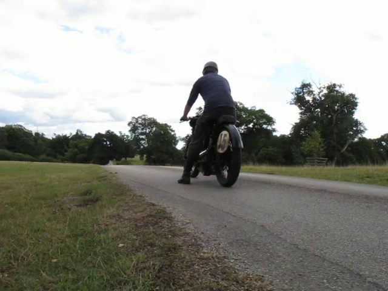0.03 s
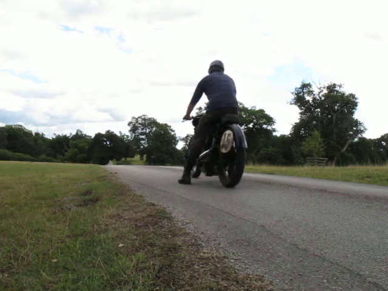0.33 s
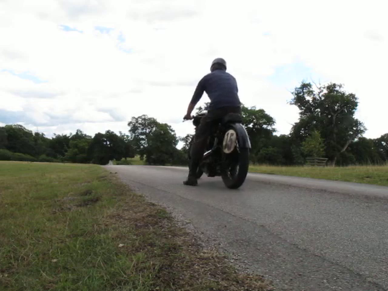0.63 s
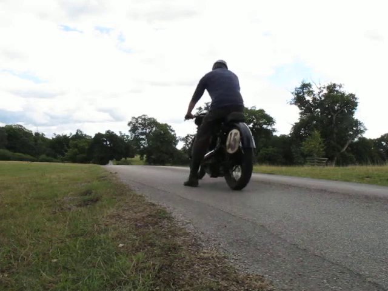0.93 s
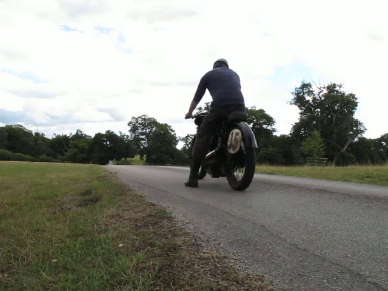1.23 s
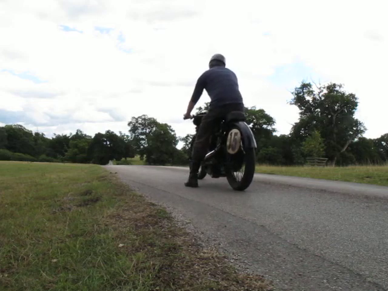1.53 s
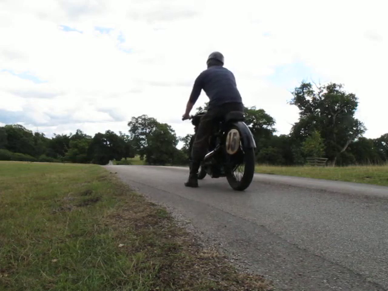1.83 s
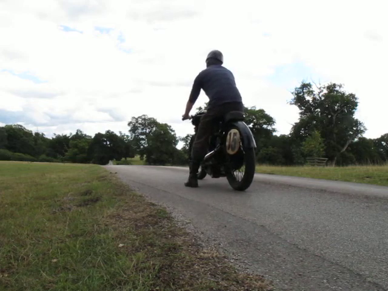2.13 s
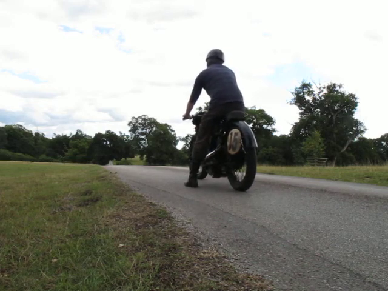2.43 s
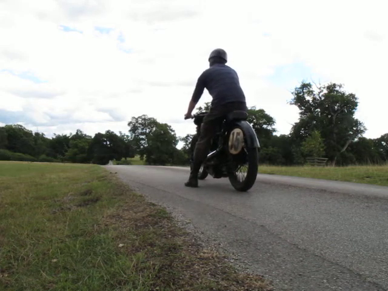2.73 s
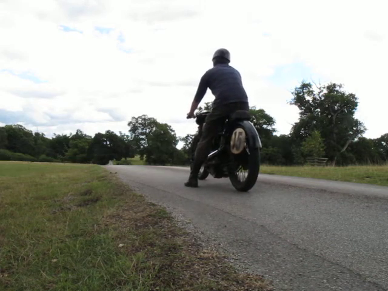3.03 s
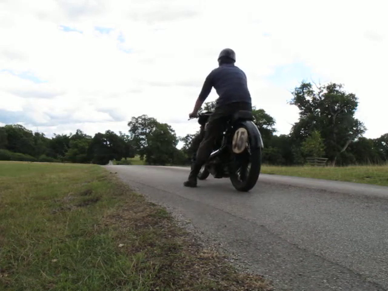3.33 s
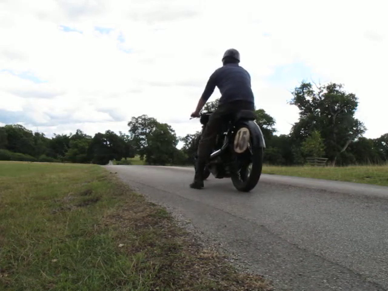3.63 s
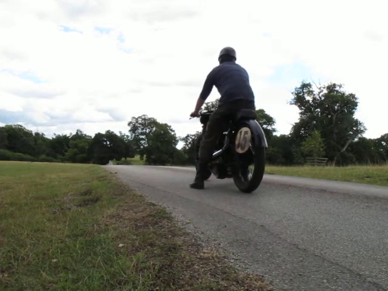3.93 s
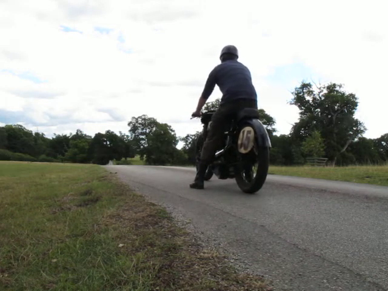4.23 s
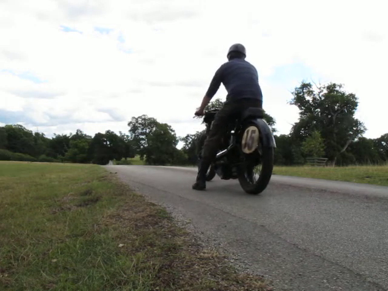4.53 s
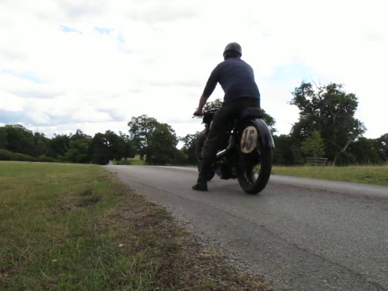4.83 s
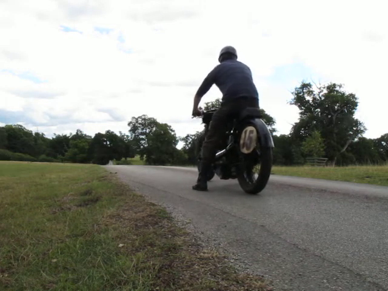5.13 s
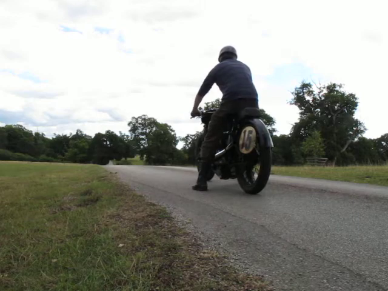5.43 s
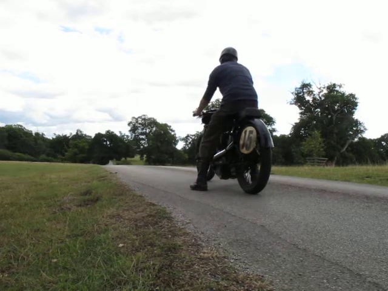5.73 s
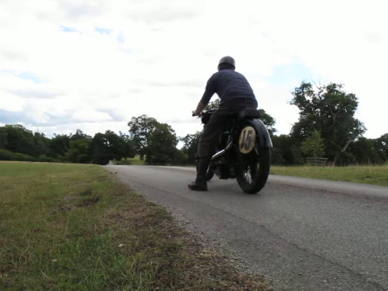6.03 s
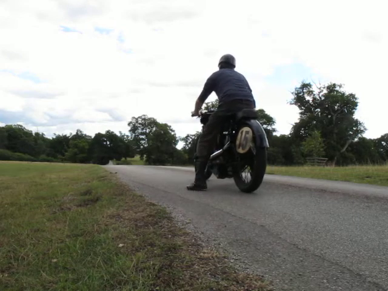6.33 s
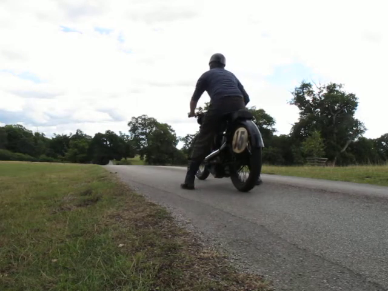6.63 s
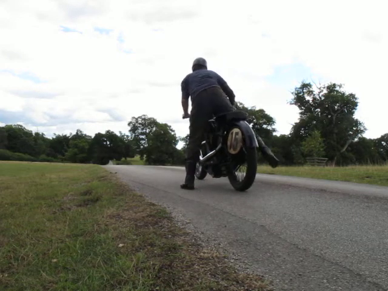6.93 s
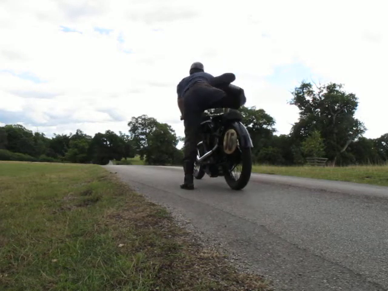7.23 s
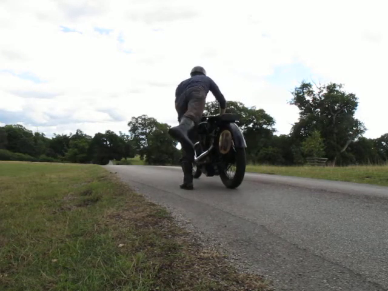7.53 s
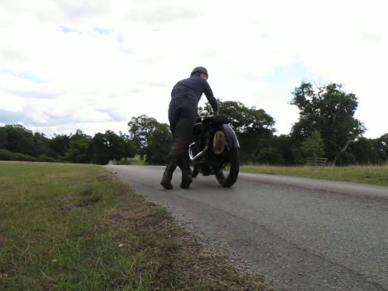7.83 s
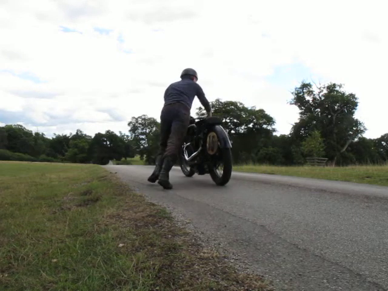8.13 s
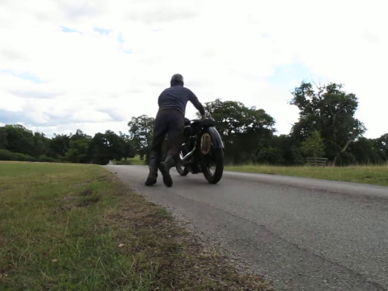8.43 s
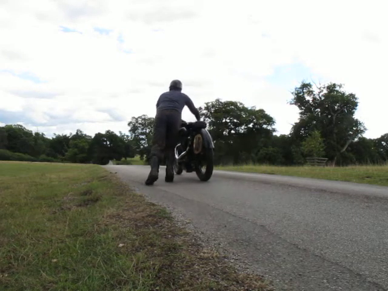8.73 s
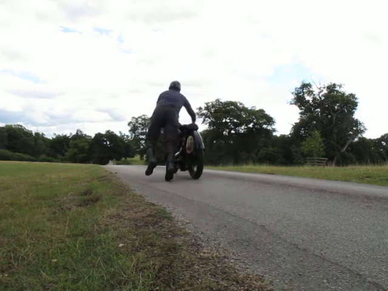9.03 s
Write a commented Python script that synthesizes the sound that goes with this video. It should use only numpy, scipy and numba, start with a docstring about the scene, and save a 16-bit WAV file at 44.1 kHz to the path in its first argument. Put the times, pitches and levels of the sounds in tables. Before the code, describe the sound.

An old motorcycle is shuffled about on a country road without its engine running, giving dry metal clacks and clicks between dull boot steps and gritty scuffs. Brighter clinks and clanks follow, and near the end the chain tinkles as the machine rolls. Low gusts of wind rumble on the microphone a few metres away, easing midway and returning, over a faint outdoor hush.

```python
"""Old motorcycle pushed off

A country road, the microphone a few metres from an old motorcycle, engine off. As it is rocked and
shuffled, lever and linkage clack, loose steel clinks, and boots thud and scuff on grit. Then it is
pushed off and the chain jingles with the wheel. Wind rumbles on the microphone over a faint hush."""
import sys
import numpy as np
from scipy import signal
from scipy.fft import rfft, irfft, next_fast_len
from scipy.io import wavfile
from scipy.ndimage import uniform_filter1d
from numba import njit

SR = 44100
rng = np.random.default_rng(int(sys.argv[2]) if len(sys.argv) > 2 else 0)


def store_pcm(level_fs):
    """Save levels as 16-bit WAV."""
    pcm = np.round(np.clip(level_fs, -1, 1) * 32767).astype(np.int16)
    wavfile.write(sys.argv[1], SR, np.atleast_2d(pcm).T)


N = 405719
T = np.arange(N) / SR
BLOW_T = T[:SR // 4]  # time within one blow

# boots landing: t/s, thud level/dB, thud t60/s, sole slide level/dB
FOOTFALLS = [(0.895, -31.5, 0.19, -59.5), (3.316, -31, 0.059, -63), (3.593, -35, 0.16, -57.5),
             (4.225, -34.5, 0.027, -80), (4.484, -35.5, 0.13, -78), (4.573, -32.5, 0.14, -56.5),
             (5.717, -40.5, 0.076, -79), (6.576, -36, .12, -76), (7.77, -31, 0.13, -62),
             (8.739, -34, 0.076, -73), (9.118, -33.5, 0.13, -50.5)]
# spectrum of dry rubbing and snapping: f/Hz, level/dB
FRICTION_COLOUR = [(700, -1), (1500, -6.5), (2600, 2.5), (4500, 1), (7000, 1), (9800, 4), (12000, -7.5),
                   (16000, -25)]


def undb(db):
    """Decibels to gain."""
    return 10 ** (np.asarray(db) / 20)


def unit(x):
    """Scale to rms 1."""
    return x / np.sqrt(np.mean(x ** 2))


def crest(x, size=110):
    """Scale so that the loudest few milliseconds have rms 1."""
    return x / np.sqrt(uniform_filter1d(x ** 2, size).max())


def add(track, s, x):
    """Mix x into the track from time s."""
    i = max(int(s * SR), 0)
    track[i:i + len(x)] += x[:N - i]


def colour(x, points):
    """Causal filter through (f/Hz, level/dB) points, built from the cepstrum of the log gain."""
    size = 2 * next_fast_len(len(x) // 2 + 2048)
    hz, db = np.transpose(points)
    bin_hz = np.arange(size // 2 + 1) * SR / size
    gain_db = np.interp(np.log(bin_hz + 1), np.log(hz), db)
    cepstrum = irfft(np.log(undb(gain_db)))
    cepstrum[1:size // 2] *= 2
    cepstrum[size // 2 + 1:] = 0
    return irfft(rfft(x, size) * np.exp(rfft(cepstrum)))[:len(x)]


def tone(x, lows_db=0, highs_db=0):
    """Lift or lower both ends of the spectrum against the middle."""
    return colour(x, [(1400, lows_db), (2300, 0), (4200, 0), (6800, highs_db)])


def wander(rate):
    """Random levels held 1 / rate s and smoothed twice, rms 1."""
    hold = int(SR / rate)
    steps = np.repeat(rng.standard_normal(N // hold + 1), hold)
    return unit(uniform_filter1d(uniform_filter1d(steps, hold), hold)[:N])


def fade(t60):
    """Exponential decay over one blow."""
    return undb(-60 * BLOW_T / max(t60, .002))


def chatter(t60):
    """A contact rattles out in a dense run of tiny impacts: decaying noise."""
    return rng.standard_normal(len(BLOW_T)) * fade(t60)


def ring(modes, scatter_db, detune=0.0024):
    """Struck modes: each striking point weights them differently and loose joints detune them."""
    out = 0
    for hz, db, t60 in modes:
        weight, phase, drift = rng.standard_normal(3)
        wave = np.sin(2 * np.pi * hz * (1 + detune * drift) * BLOW_T + np.pi * phase)
        out += undb(db + scatter_db * weight) * fade(t60) * wave
    return out


def grains(rate, spread_db):
    """Random clicks of very uneven size, rms 1."""
    clicks = (rng.random(N) < rate / SR) * rng.standard_normal(N)
    return unit(clicks * undb(spread_db * np.minimum(rng.exponential(size=N), 4)))


def hush(db=-53.5, traffic_db=-55, fade_s=1.5):
    """Far trees and traffic; a duller wash of distant traffic dies away at the start."""
    # open-air spectrum: f/Hz, level/dB
    air = [(80, -5.5), (200, -2.5), (400, -9), (700, -11.5), (1050, -12), (1600, -21.5), (2600, -25.5),
           (5000, -28), (9500, -28.5), (12500, -34.5), (16000, -43)]
    steady = undb(db + .5 * wander(1.18)) * unit(colour(rng.standard_normal(N), air))
    wash = unit(colour(rng.standard_normal(N), air))
    traffic = colour(wash, [(1300, 0), (3500, -16)])
    return steady + undb(traffic_db) * np.exp(-(T / fade_s) ** 2) * traffic


def gusts(rise_db_per_s=50, fall_db_per_s=45.5):
    """Strength of rumble and of eddies: each gust swells, holds and dies away; their powers add."""
    # gusts on the microphone: t/s, hold/s, rumble level/dB, eddy level/dB
    spells = [(0.362, 0.85, -22.5, -40), (1.253, 0.2, -19.5, -30), (1.59, 1.14, -29.5, -58),
              (3.014, 0.15, -24.5, -55.5), (4.447, 0.071, -55, -48.5), (5.17, 0.88, -33, -62),
              (5.825, 0.22, -24.5, -55), (6.372, 0.19, -20.5, -41), (6.978, 0.9, -22.5, -40.5),
              (8.03, 1.14, -21.5, -37.5)]
    rumble_power = eddy_power = 0
    for start, hold, rumble_db, eddy_db in spells:
        below_db = rise_db_per_s * np.maximum(start - T, 0)
        below_db += fall_db_per_s * np.maximum(T - start - hold, 0)
        rumble_power += undb(rumble_db - below_db) ** 2
        eddy_power += undb(eddy_db - below_db) ** 2
    return np.sqrt(rumble_power), np.sqrt(eddy_power)


def wind(flutter_db=5.5, surge_db=2.0, lull_db=-38.5, half_buffet_cycles=0.62):
    """Large eddies rumble, small ones flutter, and a few strike the microphone as single buffets."""
    # spectra of large and small eddies: f/Hz, level/dB
    rumble_colour = [(10, -3.5), (25, 6), (46, -3), (80, -13), (120, -26.5), (230, -45), (500, -79.5),
                     (8000, -130)]
    eddy_colour = [(50, -9.5), (102, 6.5), (140, -5), (190, -10.5), (270, -18.5), (500, -32), (8000, -100)]
    # single buffets: t/s, level/dB, f/Hz
    buffets = [(.295, -18.5, 62), (0.461, -22.5, 109), (.80, -18, 109), (0.846, -12, 44),
               (1.208, -4.5, 129), (1.226, 3, 66.7), (1.381, -18.5, 141), (1.515, -16.5, 122),
               (1.76, -10.5, 33.5), (2.997, -17.5, 44.7), (3.044, -17.5, 30), (3.137, -16.5, 47.3),
               (3.197, -19.5, 33.6), (5.17, -24, 45.3), (6.094, -12, 32.4), (7.079, -14.5, 50)]
    rumble = colour(rng.standard_normal(N), rumble_colour)
    rumble /= np.sqrt(uniform_filter1d(rumble ** 2, size=6000))  # even out before the gusts shape it
    eddies = unit(colour(rng.standard_normal(N), eddy_colour) * undb(flutter_db * wander(26)))
    rumble_gain, eddy_gain = gusts()
    surge = undb(surge_db * wander(14))
    out = np.hypot(rumble_gain, undb(lull_db)) * surge * rumble + eddy_gain * eddies
    for s, db, hz in buffets:
        cycles = hz * (T - s)
        swell = np.exp(-(cycles / half_buffet_cycles) ** 2)
        out += undb(db) * swell * np.cos(2 * np.pi * (cycles + rng.random()))
    return out


def scuffs(sole_s=.1, sole_highs_db=-2):
    """Each slide is a swell of fine friction grains; a short one follows every landing boot."""
    # longer slides of soles and clothing: t/s, length/s, level/dB, highs/dB
    slides = [(.47, 0.1, -51.5, -8), (.92, 0.15, -56, -5), (1.67, 0.16, -60, 17), (3.42, 1.0, -66.5, 2),
              (4.03, 0.46, -58, 0), (6.68, 0.24, -62, 0)]
    out = np.zeros(N)
    friction = colour(grains(rate=9000, spread_db=3.0), FRICTION_COLOUR)
    soles = [(s, sole_s, db, sole_highs_db) for s, _, _, db in FOOTFALLS]
    for s, length, db, highs_db in slides + soles:
        slide = unit(tone(friction[(T >= s) & (T < s + length)], highs_db=highs_db))
        add(out, s, undb(db) * slide * np.sin(np.linspace(0, np.pi, len(slide))))
    return out


def snap(t60, highs_db):
    """A brief, bright contact with hardly any ring."""
    return crest(tone(colour(chatter(t60), FRICTION_COLOUR), highs_db=highs_db))


def grit(t60=0.013):
    """Small stones crack under soles and tyres."""
    # cracks: t/s, level/dB, highs/dB
    stones = [(0.5563, -37.5, -6), (0.5742, -33.5, -15.5), (3.3308, -35, -13), (5.85, -32, 1),
              (7.805, -43, 6), (9.1424, -33.5, -5)]
    out = np.zeros(N)
    for s, db, highs_db in stones:
        add(out, s, undb(db) * snap(t60, highs_db))
    return out


def boots():
    """Each heel lands on the road with a dull thud."""
    # thud spectrum: f/Hz, level/dB
    thud_colour = [(90, -31), (160, 1.5), (230, 1), (340, -3.5), (500, -12.5), (900, -26), (9000, -34.5),
                   (15000, -52)]
    out = np.zeros(N)
    for s, db, t60, _ in FOOTFALLS:
        add(out, s, undb(db) * crest(colour(chatter(t60), thud_colour)))
    return out


def saddle(start=5.475, length=0.14, first_hz=90, last_hz=260, db=-55):
    """The saddle creaks, sticking and slipping faster and faster as the weight shifts."""
    slip_hz = np.linspace(first_hz, last_hz, int(length * SR))
    since_slip = np.cumsum(slip_hz) / SR % 1  # in cycles
    slips = rng.standard_normal(len(slip_hz)) * np.exp(-since_slip / 0.18)
    creak = unit(colour(slips, FRICTION_COLOUR))
    out = np.zeros(N)
    add(out, start, undb(db) * creak * np.sin(np.linspace(0, np.pi, len(creak))))
    return out


def spring(start=3.462, step_s=0.016, db=-47.5, fall_db=1.5, count=6):
    """A small return spring buzzes against its seat, a little weaker on each bounce."""
    # spring modes: f/Hz, level/dB, t60/s
    modes = [(5470, -5, .018), (6200, -1, 0.02), (7200, 0, 0.02)]
    out = np.zeros(N)
    for bounce in range(count):
        add(out, start + bounce * step_s, undb(db - fall_db * bounce) * crest(ring(modes, scatter_db=0)))
    return out


def ratchet(start=3.763, step_s=0.081, db=-46, count=6):
    """A pawl ticks lightly over an even row of teeth."""
    out = np.zeros(N)
    for s in start + step_s * np.arange(count):
        add(out, s, undb(db) * snap(t60=0.011, highs_db=4))
    return out


def chain(push_off_s=8.16, speed_up_s=0.34, roll_db=-45, tinkle_count=44):
    """Links drop with a bright jingle; once the wheel turns, light tinkles ride on rollers and tyres."""
    # heavy links dropping on the sprocket: t/s, level/dB, highs/dB
    links = [(6.085, -31.5, 1), (7.127, -50, -1), (7.448, -53.5, 17), (7.564, -43, 1), (7.962, -41.5, 8.5),
             (8.308, -41.5, -2), (8.45, -35.5, 6), (8.613, -37, 4), (8.657, -35, 6), (8.795, -45, 5),
             (8.904, -42.5, -3), (9.025, -33.5, 3), (9.06, -34, 2.5), (9.095, -30, 6.5)]
    # modes of chain and sprocket: f/Hz, level/dB, t60/s
    modes = [(1294, 0.5, 0.024), (1772, -4, 0.055), (2540, 0.5, 0.034), (2900, -2, 0.043),
             (3070, -2, 0.053), (4030, -2.5, 0.035), (5670, -3.5, 0.041), (5910, -3, 0.037),
             (7130, -0.5, 0.035), (8090, 2, 0.048), (8420, 3, 0.048), (9290, -1, 0.042),
             (10420, -12, 0.086), (13000, -20, 0.09)]
    # contact spectrum: f/Hz, level/dB
    contact_colour = [(300, -10), (700, 0), (1400, 2.5), (2900, -6.5), (4400, -10.5), (5800, -7),
                      (8300, -6.5), (10500, -10), (12500, -27), (16000, -55)]
    drops, tinkles = np.zeros(N), np.zeros(N)
    for s, db, highs_db in links:
        rattle = crest(colour(chatter(0.11), contact_colour))
        jingle = crest(ring(modes, scatter_db=5.5) * (1 - fade(0.0018)))
        add(drops, s, undb(db) * crest(tone(rattle + undb(3) * jingle, highs_db=highs_db)))
    slots = np.linspace(push_off_s, T[-1], tinkle_count)
    for s, (early, size) in zip(slots, rng.random((tinkle_count, 2))):
        # a link slides into contact, so its ring swells for a moment
        scrape = crest(tone(colour(chatter(.04), contact_colour), highs_db=-5))
        jingle = crest(ring(modes, scatter_db=6, detune=.008) * (1 - fade(.01)))
        add(tinkles, s - 0.033 * early, size * crest(jingle + undb(-4) * scrape))
    # rollers held tight on the teeth ring the same modes, but damped
    taps = grains(rate=260, spread_db=3)
    damped = tone(ring(modes, scatter_db=1.5), highs_db=-7.5) * fade(0.018)
    rollers = unit(signal.oaconvolve(taps, damped)[:N])
    tyres = unit(colour(rng.standard_normal(N), contact_colour) * undb(2.4 * wander(45)))
    rolling = undb(7) * tinkles + undb(-9) * rollers + undb(-10) * tyres
    speed = 1 - np.exp(-np.maximum(T - push_off_s, 0) / speed_up_s)  # share of walking pace
    return drops + undb(roll_db) * speed * rolling


def struck_steel(blows, modes):
    """Steel parts chatter against each other and are left ringing."""
    # chatter spectrum: f/Hz, level/dB
    contact_colour = [(400, -10), (950, 2.5), (1300, 5), (1850, 3.5), (2300, -4), (3000, -1), (3800, -5),
                      (7000, 4), (9900, -1), (12000, -19), (16000, -30)]
    out = np.zeros(N)
    for s, db, t60, highs_db, ring_db in blows:
        rattle = crest(colour(chatter(t60), contact_colour))
        ringing = crest(ring(modes, scatter_db=2.5) * (1 - fade(t60)))  # builds during the chatter
        add(out, s, undb(db) * crest(tone(rattle + undb(ring_db) * ringing, highs_db=highs_db)))
    return out


def loose_part():
    """A small loose steel part clinks in one quick cluster."""
    # clinks: t/s, level/dB, chatter t60/s, highs/dB, ring/dB
    clinks = [(6.047, -41, 0.042, -14, -18), (6.105, -37, 0.053, -11, -23), (6.1098, -24, 0.042, 2.5, -15),
              (6.145, -42, 0.052, -14, -16), (6.155, -38.5, 0.01, -6, -5.5)]
    # modes of the part: f/Hz, level/dB, t60/s
    modes = [(960, -1, 0.14), (1365, 5, 0.11), (2035, 1, 0.27), (3130, -1.5, 0.14), (4300, -2, 0.11),
             (5660, -2, 0.1), (5700, -3, 0.1), (6853, -3, 0.12), (7246, 3, 0.13), (9440, 2, 0.13),
             (10850, -2, 0.15)]
    return struck_steel(clinks, modes)


def loose_part_clanks():
    """The same loose steel part clanks harder as the machine is rocked and leans over."""
    # further, heavier clanks of the same part: t/s, level/dB, chatter t60/s, highs/dB, ring/dB
    clanks = [(2.273, -34, 0.058, -6, -15), (2.294, -38, 0.07, -21, -15), (2.308, -38.5, 0.04, -9, -15),
              (2.341, -47, 0.05, -9, -25), (6.3146, -30, 0.077, 0, -8.5), (6.324, -31.5, 0.096, -12, -10),
              (6.408, -35.5, 0.063, -4.5, -13)]
    # modes of the part as these heavier blows ring it: f/Hz, level/dB, t60/s
    modes = [(982, 4.5, .1), (1822, 5, 0.079), (2030, 0, .11), (3150, -2.5, 0.15), (4670, 3.5, 0.1),
             (5800, 1.5, 0.13), (8300, 3, .11), (8840, 5, .11), (9087, 3, 0.14), (14560, -11, 0.07)]
    return struck_steel(clanks, modes)


def rattles(per_s=24, centre_hz=2350, spread_db=1.5, lows_db=2, highs_db=-7):
    """Rows of light, uneven clacks while the rider shifts and climbs off."""
    # spells of rattling: t/s, length/s, level/dB
    spells = [(2.959, .04, -44.5), (6.536, .18, -50), (7.174, .14, -52)]
    rows = []
    for start, length, db in spells:
        slots = np.arange(start, start + length, 1 / per_s)
        for s, (late, size, pitch) in zip(slots, rng.random((len(slots), 3))):
            level_db = db + spread_db * (2 * size - 1)
            hz = centre_hz * 2 ** (pitch - .5)
            rows.append((s + late / per_s / 2, level_db, hz, lows_db, highs_db))
    return rows


def lever_and_linkage(rattle_t60=0.041, build_t60=0.0039, part_db=-0.5, linkage_db=-11):
    """Tight, oily steel: a brief rattle rings the struck part and, more weakly, the whole linkage."""
    # dry clacks: t/s, level/dB, main resonance f/Hz, lows/dB, highs/dB
    clacks = [(1.4922, -39.5, 2910, 1, -1.5), (1.561, -43, 2790, -5, -12), (1.573, -49, 3000, -8, -5),
              (1.605, -41.5, 2700, -12, 1), (1.655, -35.5, 1540, 10, -11), (1.6748, -22, 2580, 5.5, 7),
              (1.733, -27.5, 2650, 18, 5), (1.7386, -18, 2625, 5, -1.5), (1.8923, -34.5, 3680, -12, -4),
              (1.925, -47, 3440, 0, -5), (2.149, -49, 2600, 0, -26), (2.4917, -37, 2850, -5, -9),
              (2.535, -39.5, 3510, -5, 10), (2.6431, -37, 2000, 7, -6.5), (2.9067, -34, 3460, -23, -5),
              (3.232, -52.5, 3400, -10, -20), (3.884, -47.5, 3130, -4, 6), (3.3362, -33.5, 5240, 0, -5.5),
              (3.3753, -42.5, 5760, 3, -10), (3.39, -44.5, 5500, 2, -8), (3.458, -42, 5300, -1, -4),
              (4.169, -36.5, 4730, 2.5, -12), (4.2921, -32, 3430, -4.5, -2.5), (4.359, -39.5, 1690, 3, -10),
              (4.471, -40, 3410, 12, 5), (5.968, -37.5, 4690, 0.5, -16), (7.345, -48, 2220, 3, -3),
              (8.086, -43, 1740, -3, -7), (8.1749, -35.5, 2670, 0, -10), (8.412, -39, 2530, 10, -5),
              (8.7534, -35.5, 3160, -3, -23), (9.0108, -48, 3080, 7, -22), (9.124, -27, 5840, -5, -5)]
    # rattle spectrum: f/Hz, level/dB
    rattle_colour = [(150, 6), (350, 0), (700, -3.5), (1300, -1.5), (2700, -2.5), (4400, -3), (6300, -1.5),
                     (7600, 2), (9900, -1), (12000, -13), (16000, -31)]
    # modes of the struck part: multiple of its main resonance, level/dB, t60/s
    part_modes = [(.68, -9, .022), (.87, -3, .028), (1, 2, .028), (1.17, -3, .024), (1.43, -8, 0.039)]
    # damped linkage modes: f/Hz, level/dB, t60/s
    linkage_modes = [(1860, 1, 0.049), (2320, 0, .03), (2720, -1, 0.039), (3110, 3, .03), (4980, 3, 0.031),
                     (7400, 6, 0.025), (7820, 10, 0.02), (9600, -9, 0.043)]
    out = np.zeros(N)
    for s, db, hz, lows_db, highs_db in clacks + rattles():
        tuned = [(hz * ratio, mode_db, t60) for ratio, mode_db, t60 in part_modes]
        part = crest(ring(tuned, scatter_db=2))
        linkage = crest(ring(linkage_modes, scatter_db=4))
        rattle = crest(colour(chatter(rattle_t60) * (1 - fade(build_t60)), rattle_colour))
        blow = crest(tone(rattle + undb(linkage_db) * linkage, lows_db, highs_db))
        add(out, s, undb(db) * crest(blow + undb(part_db) * part))
    return out


def scene():
    """The machine and its rider, with a faint scatter from road and verge, under the wind."""
    metal = lever_and_linkage() + loose_part() + loose_part_clanks() + chain() + ratchet() + spring()
    direct = metal + boots() + grit() + scuffs() + saddle()
    scatter = chatter(t60=0.21)
    reflected = signal.oaconvolve(direct, scatter / np.linalg.norm(scatter))[:N]
    return (direct + undb(-15) * reflected + hush() + wind())[None]


@njit
def limiter(x, ceiling, step, recovery):
    """The gain steps down while the sound is over the ceiling, which ticks, and then creeps back up."""
    y, gain = np.empty(len(x)), 1.
    for i in range(len(x)):
        gain = gain * step if abs(x[i]) * gain > ceiling else min(gain * recovery, 1.)
        y[i] = x[i] * gain
    return y


def record(dry, open_s=0.069, ceiling=0.68, step_db=-.4, recovery_db_per_s=20, top_hz=16100):
    """One microphone, opened a moment late; a limiter ducks on the biggest buffet and the top is cut."""
    opened = np.clip((T - open_s) / .005, .01, 1)
    step, recovery = float(undb(step_db)), float(undb(recovery_db_per_s / SR))
    limited = limiter(dry[0] * opened, ceiling, step, recovery)
    lowpass = signal.ellip(10, .1, 80, top_hz, fs=SR, output="sos")
    return signal.sosfilt(lowpass, limited)[None]


dry = scene()
out = record(dry)
store_pcm(out)
```